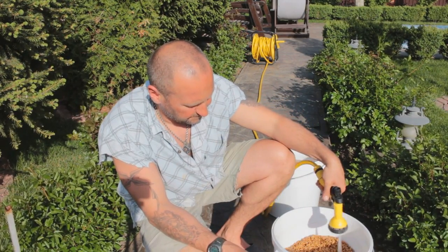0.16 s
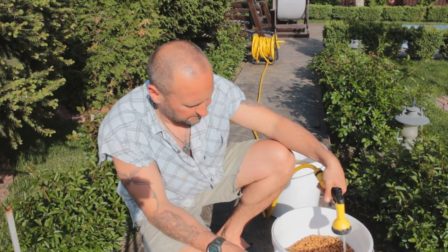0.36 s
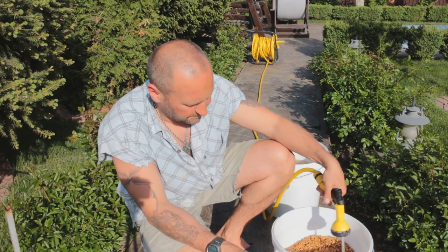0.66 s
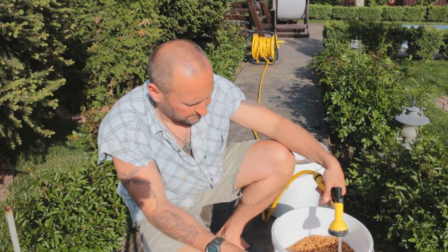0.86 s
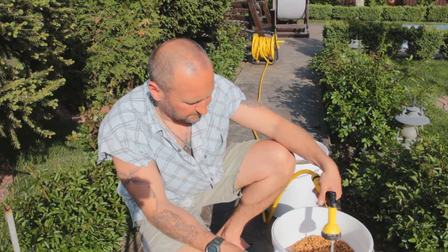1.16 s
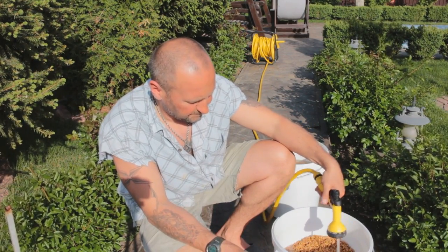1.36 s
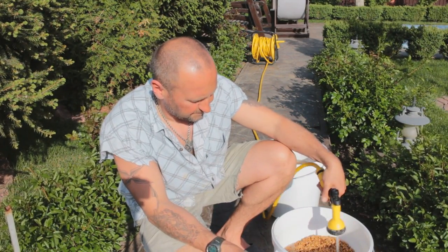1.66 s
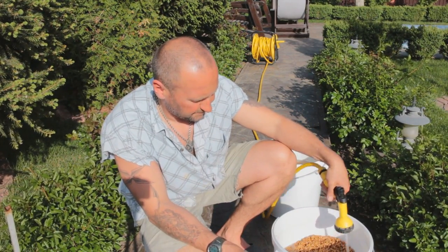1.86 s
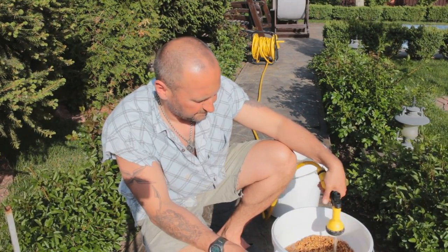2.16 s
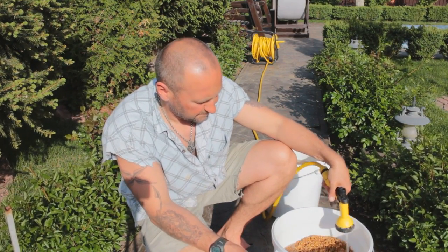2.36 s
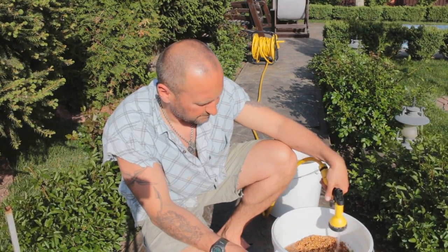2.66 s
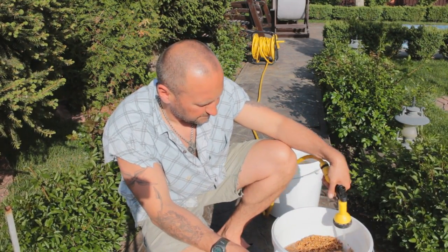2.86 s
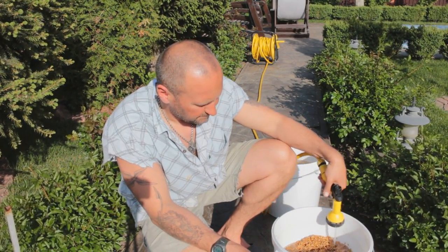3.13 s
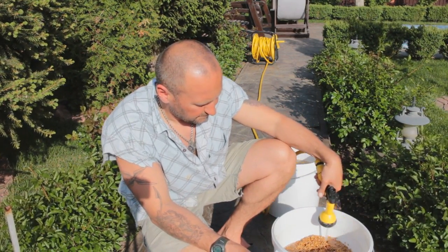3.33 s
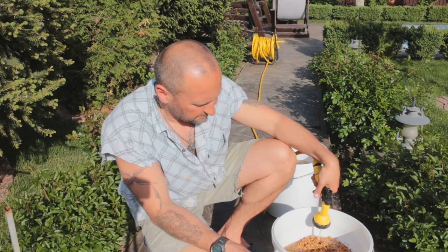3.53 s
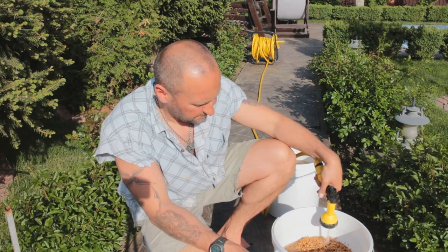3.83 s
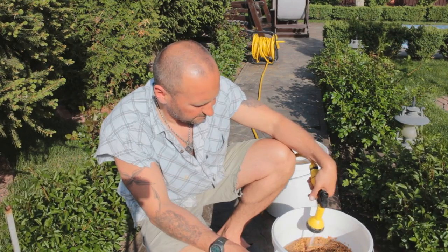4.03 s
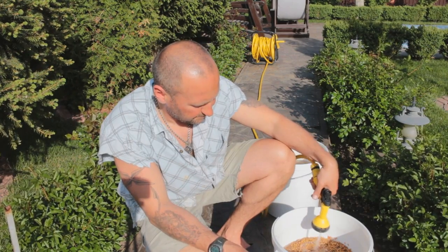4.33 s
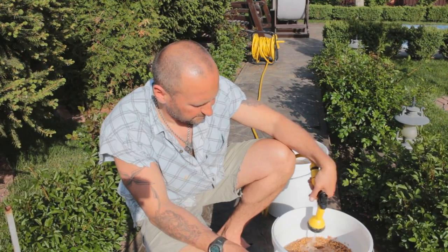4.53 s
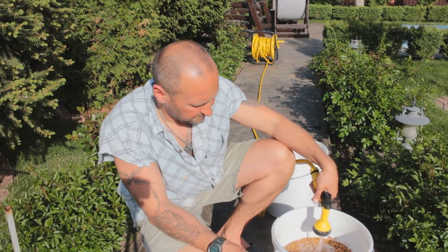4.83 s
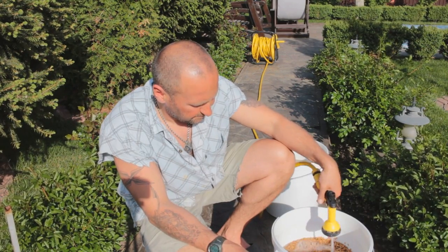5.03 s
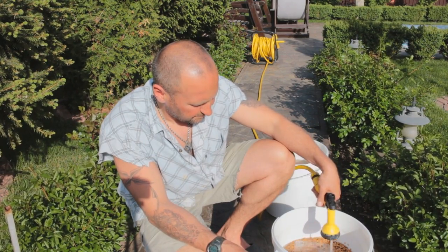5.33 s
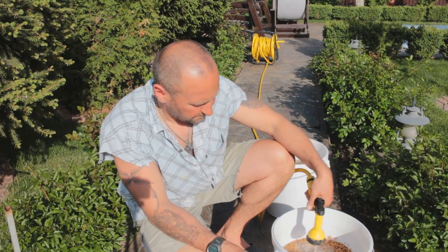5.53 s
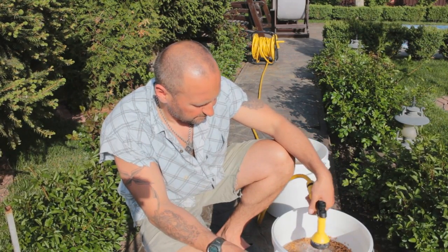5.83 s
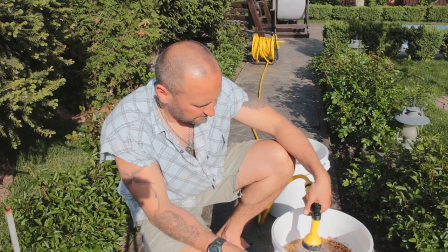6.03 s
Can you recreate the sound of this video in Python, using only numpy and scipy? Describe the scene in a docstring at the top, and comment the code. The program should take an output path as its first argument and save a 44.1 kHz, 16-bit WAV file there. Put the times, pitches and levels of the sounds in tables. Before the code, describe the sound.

A garden hose sprays water into a plastic bucket of grain, close by, for the whole six seconds: a mix of splashing, small bubbles and bright hiss. The bucket adds a slightly hollow ring that shifts about every half second as the jet moves. The water swells briefly at the start and at 0.7 seconds, then surges in quick, splashy pulses from about 2.3 to 5 seconds. Small plops fall near 2.4, 3.1, 3.5, 5.5 and 6.1 seconds. From about 5 seconds a soft low rumble joins as the water deepens. Wind buffets the microphone with low, wide rumbles and thumps, strongest near 0.2, 1.1, 2 to 2.2 and 2.9 seconds, mostly on the right, with one more thump on the left at 5.3 seconds. A faint, distant garden rustle lies underneath throughout.

```python
"""In a garden, a hose jet waved by hand splashes into a plastic bucket of grain that fills with water.
Splash, spray and bubbles make the air in the bucket ring, and the tone changes with the spot the jet
hits. A few big drops plop, and deeper water adds a rumble. Gusts buffet two microphone ports (openings);
the camera widens this bass by subtracting part of each from the other. Far off, the garden rustles."""
import sys
import numpy as np
from scipy import signal
from scipy.fft import rfft, irfft, next_fast_len
from scipy.io import wavfile
from scipy.ndimage import uniform_filter1d, map_coordinates

SR = 44100
rng = np.random.default_rng(int(sys.argv[2]) if len(sys.argv) > 2 else 0)


def unload_audio(sound):
    """Save the sound as a 16-bit wav file, at the path given as the first command line argument."""
    columns = np.transpose(np.atleast_2d(sound))
    # keep every value between -1 and 1, then stretch to whole-number steps
    steps = np.round(np.clip(columns, -1, 1) * 32767)
    wavfile.write(sys.argv[1], SR, steps.astype(np.int16))


N = 272979

# The jet between surges. Each row: time in seconds, then bubble, splash, spray and mist levels in dB.
JET_FLOW = [(0.0, -49.5, -41.5, -35, -37.5), (0.5, -48.5, -40.5, -36.5, -41), (1.15, -55, -42, -39.5, -43),
            (1.55, -46.5, -38, -41.5, -44.5), (2.2, -47, -38, -37.5, -39), (2.65, -42.5, -38.5, -39.5, -47),
            (3.1, -43, -35.5, -41.5, -38), (3.35, -42, -37, -49.5, -48.5), (3.7, -41.5, -42.5, -38, -42),
            (4.15, -44.5, -38.5, -40.5, -38.5), (4.7, -42.5, -37.5, -41.5, -37.5),
            (5.2, -41.5, -35.5, -35, -35), (5.6, -45.5, -38.5, -37.5, -39), (6.19, -41.5, -38, -40.5, -43)]
# Swings of the jet. Each row: middle and length in seconds, swell in dB, pitch in octaves above 1 kHz.
JET_SURGES = [(0.014, 0.03, 17, 0.2), (0.67, 0.087, 12.5, 0.26), (0.977, 0.2, 3.5, 2),
              (1.257, 0.17, 2.5, 2), (1.434, 0.17, 6.5, 3.5), (1.72, 0.27, 4.5, 3), (1.985, 0.13, 4, 3),
              (2.328, 0.11, 5.5, 4), (2.409, 0.1, 5.5, 0), (2.528, 0.23, 13, 3.5), (2.71, 0.096, 8.5, 3.5),
              (2.785, 0.16, 13, 4), (2.988, 0.14, 10, 2.5), (3.275, 0.22, 11.5, 3.5),
              (3.434, 0.094, 8.5, 3), (3.581, 0.21, 10, 2.5), (3.813, 0.097, 12.5, 1.91),
              (3.993, 0.14, 12.5, 1.83), (4.187, 0.1, 11, 2.5), (4.321, 0.11, 13, 2.07),
              (4.443, 0.09, 9, 2), (4.567, 0.1, 14, 2), (4.663, 0.092, 17.5, -2), (4.808, 0.11, 6.5, 1.5),
              (4.95, 0.076, 6.5, 1.3), (5.382, 0.043, 4, 1.5), (6.105, 0.093, 4, 1)]
# Where bubbles, splash, spray and mist sit for a surge, in octaves above 1 kHz.
LAYER_OCTAVES = [-.4, 1, 2.2, 3.1]
# The tone of each noise. Each row: pitch in Hz, relative level in dB.
BUBBLE_TONE = [(250, -62), (450, -4.5), (650, -2), (900, -3), (1200, 4.5), (2000, -13)]
SPLASH_TONE = [(500, -23), (1150, -11.5), (1300, 5.5), (2800, 1.5), (3600, 4.5), (6000, -67)]
SPRAY_TONE = [(1800, -16), (3000, -6.5), (3600, -2), (5600, 2.5), (6800, -2.5), (10000, -55)]
MIST_TONE = [(3500, -17.5), (5500, -5.5), (7000, -4.5), (9200, -1.5), (10500, -8), (11600, -13.5),
             (15500, -20.5)]
RUMBLE_TONE = [(90, -30), (150, -7.5), (230, -0.5), (300, -16), (450, -3.5), (700, -33.5)]
EDDY_TONE = [(8, -0.5), (25, -18), (60, -6), (100, -0.5), (150, -5.5), (300, -21), (700, -50),
             (1500, -57.5)]  # before wind speed shifts the pitch
GARDEN_TONE = [(20, -75), (110, -4.5), (240, -15), (350, -3), (480, -15), (4000, -25), (15500, -31)]
# The lowest mode (ringing note) of the bucket's air. The row: pitch in Hz, width in Hz, level in dB.
LOW_MODE = [(801, 60, 8)]
# Higher modes, one list for each spot the jet hits. Each row: pitch in Hz, width in Hz, level in dB.
SPOT_MODES = [
    [(1357, 170, 1.5), (2030, 1000, 7.5), (2700, 140, 9.5), (3680, 200, -6.5)],
    [(1362, 220, 5), (2076, 870, 7), (2620, 98, 8.5), (3180, 82, -4), (3760, 190, -10)],
    [(1360, 370, 2.5), (2129, 1200, 8), (2720, 390, 2.5), (3570, 740, -2), (4280, 160, -2)],
    [(2080, 473, -14), (2500, 300, -5.5), (4520, 370, 0.5), (5170, 330, -11)],
    [(1420, 260, 3.5), (2060, 390, 10), (2590, 270, 6.5), (3190, 263, -2), (3780, 150, -5)],
    [(1280, 190, -9), (2100, 270, -5), (2697, 342, 0.5), (3340, 230, -6), (4100, 510, -8)],
    [(1187, 200, -0.5), (1980, 670, -10), (2520, 310, -8), (3850, 250, -2.5), (4360, 990, -9)],
    [(1210, 193, 9), (1993, 700, 6), (2470, 350, 1), (3730, 440, -1.5), (4500, 600, -8)],
    [(1233, 93, 4), (1890, 263, -0.5), (2530, 410, 3), (3180, 830, -1), (4120, 900, -3.5)],
    [(1245, 91, 0), (2523, 280, 5.5), (3030, 120, 3.5), (3670, 120, 1), (4650, 470, 1)],
    [(1252, 206, 2.5), (2480, 520, 10), (3100, 380, 2), (3750, 430, 2.5), (4660, 200, 2.5)],
    [(1520, 200, 9.5), (1940, 200, 11), (2586, 710, 7.5)],
    [(1490, 260, 5.5), (2400, 115, 10.5), (2820, 180, 7), (3320, 320, 1.5), (4770, 210, -9)],
]
# When the jet moves on to the next spot, in seconds.
MOVE_TIMES = [.58, 1.4, 1.93, 2.36, 2.62, 3.1, 3.73, 4.13, 4.7, 5.02, 5.45, 5.85]
# Single big drops. Each row: start in seconds, strength in dB, pitch in Hz.
BIG_DROPS = [(2.394, -10, 1920), (3.136, -9, 1540), (3.521, -3, 2350), (5.5234, -8.5, 2100),
             (6.102, -11, 2304)]
# Light wind at both ports. Each row: time in seconds, level in dB.
BREEZE_LEVELS = [(0, -32.5), (.35, -48), (.85, -41), (1.5, -38), (2.3, -34.5), (2.6, -37), (3.2, -41),
                 (4.18, -46), (4.9, -34.5), (5.75, -41.5), (5.95, -53), (6.19, -61)]
# Gusts. Each row: middle in seconds, hold in seconds, level in dB, port (0 left, 1 right).
PORT_GUSTS = [(0.131, .12, -21.5, 0), (0.182, 0.051, -15, 1), (0.253, 0.0058, -27, 0),
              (0.721, 0.011, -27.5, 1), (1.052, 0.046, -10, 1), (1.11, 0.22, -21, 0),
              (1.298, 0.048, -20.5, 0), (1.301, 0.024, -13, 1), (1.516, 0.093, -27, 0),
              (1.738, .02, -13.5, 0), (1.741, 0.03, -22, 1), (1.899, 0.015, -20, 0),
              (1.906, 0.033, -23.5, 1), (1.974, 0.02, -18, 1), (2.139, 0.16, -17, 0), (2.153, 0.13, -13, 1),
              (2.355, 0.16, -27, 1), (2.443, 0.028, -23.5, 0), (2.708, 0.077, -22.5, 1),
              (2.845, 0.26, -20, 0), (2.852, 0.07, -13, 1), (3.002, 0.072, -25, 1),
              (3.097, 0.039, -29.5, 0), (3.123, 0.018, -29.5, 1), (3.539, 0.08, -27, 1),
              (3.543, .12, -27, 0), (4.764, 0.0053, -23.5, 0), (4.79, 0.038, -27, 1),
              (4.906, 0.0064, -25, 0), (5.253, 0.0045, -20, 0), (5.258, 0.02, -28.5, 1)]
# Strong eddies (swirls of air). Each row: time in seconds, peak in dB, port (0 left, 1 right).
EDDY_THUMPS = [(0.186, -3, 1), (1.058, -2, 1), (1.1, -13, 0), (1.176, -8.5, 0), (1.987, -10.5, 1),
               (2.15, -14, 1), (2.416, -26, 0), (2.883, -1.5, 1), (5.258, -6.5, 0)]
# How the ports differ. Each row: pitch in Hz, left over right in dB, right's lead in radians.
PORT_MISMATCH = [(1000, .5, 0), (2100, 0.3, 0.094), (5300, -1.5, 0.31), (6500, -.2, 0.069), (8600, .1, 0),
                 (12000, 3, 0.55), (13100, 0, 1), (14200, -1.8, .25)]
# A diffuse stereo wash of the water, with bright hiss. Each row: pitch in Hz, relative level in dB.
WASH_TONE = [(200, 0), (1200, -5), (2500, -3.5), (8300, -7), (11500, 9.5), (15500, 6)]

FRAME = dict(nperseg=1024, noverlap=768)  # cuts sound into short overlapping slices


def hose_jet():
    """Four sizes of water noise, from bubbles to mist, all shaken by the unsteady jet."""
    bubble_db, splash_db, spray_db, mist_db = jet_levels()
    flutter = 0.5 * wobble(30) + 0.56 * wobble(90)
    shake = lambda: flutter + .8 * wobble(20)  # each size also wavers on its own
    bubbles = patter(hz=748, spread=0.395, cycles=6.5, vary_db=3, share=0.1,
                     rise=0.055, number=2500, samples=700)
    splash = patter(hz=2138, spread=0.364, cycles=5.2, vary_db=-1.5, share=0.12,
                    rise=0.098, number=6000, samples=400)
    spray = patter(hz=4400, spread=0.274, cycles=12.7, vary_db=1.5, share=0.21,
                   rise=0.074, number=9000, samples=200)
    mist = patter(hz=12000, spread=0.36, cycles=2.3, vary_db=3.5, share=0.29,
                  rise=0, number=12000, samples=32)
    bubbles = unit(filtered(bubbles, lambda hz: 1 + ringing(hz, LOW_MODE)))
    bucket = bucket_ring()
    jet = (amp(bubble_db + shake()) * coloured(bubbles, BUBBLE_TONE)
           + amp(splash_db + shake()) * through(coloured(splash, SPLASH_TONE), bucket)
           + amp(spray_db + shake()) * through(coloured(spray, SPRAY_TONE), bucket)
           + amp(mist_db + shake() + 1.2 * flutter) * coloured(mist, MIST_TONE))
    return patchy(jet, streak_db=2.5, swish_db=1.8)


def jet_levels(reach_octaves=1.51, lag_s_per_octave=0.012):
    """Levels of the four water noises in dB. Each swing swells them, the coarser ones later."""
    t, layers = np.arange(N) / SR, np.array(LAYER_OCTAVES)[:, None]
    levels = np.array(curves(JET_FLOW))
    for middle, length, db, centre in JET_SURGES:
        gap = centre - layers
        swell = np.exp(-(2 * (t - middle - lag_s_per_octave * gap) / length) ** 2)
        levels += db * np.exp(-(gap / reach_octaves) ** 2) * swell
    return levels


def patter(hz, spread, cycles, vary_db, share, rise, number, samples):
    """Many tiny water blips at random times over hiss; share is their part of the power."""
    pitch_luck, size_luck = rng.standard_normal((number, 2)).T
    pitches = np.clip(hz * np.exp(spread * pitch_luck), 100, SR / 3)
    bursts = blips(rng.random(number) * N, pitches, cycles, amp(vary_db * size_luck), rise, samples)
    return np.sqrt(share) * unit(bursts) + np.sqrt(1 - share) * rng.standard_normal(N)


def blips(starts, hz, cycles, size, rise, samples):
    """Short tones that start softly, rise in pitch and die away, added at their start samples."""
    turns = hz[:, None] * np.arange(samples) / SR
    loudness = size[:, None] * np.exp(-3 * turns / cycles) * (1 - np.exp(-turns))
    waves = loudness * np.sin(2 * np.pi * turns * (1 + rise * turns / cycles))
    at = starts.astype(int)[:, None] + np.arange(samples)
    return np.bincount(at.ravel(), waves.ravel(), N + samples)[:N]


def bucket_ring(move_s=0.1, sink_per_s=.07, direct=.4, contrast=.35):
    """Gain over pitch and time: the bucket's air modes change with the spot hit, sink and waver."""
    hz, t = np.fft.rfftfreq(1024, 1 / SR)[:, None], np.arange(N // 256 + 2) * 256 / SR
    aim = sum(np.clip((t - s) / move_s + .5, 0, 1) for s in MOVE_TIMES)
    waver = .012 * np.interp(t * SR, np.arange(N), wobble(6))
    gain = np.zeros((len(hz), len(t)), complex)
    for spot, modes in enumerate(SPOT_MODES):
        on = np.abs(aim - spot) < 1
        tuning = 1 + waver[on] - sink_per_s * (t[on] - t[on].mean())
        ring = direct + ringing(hz / tuning, modes)
        gain[:, on] += (1 - np.abs(aim[on] - spot)) * ring * np.abs(ring) ** contrast
    return gain


def ringing(hz, modes):
    """How the bucket's air answers each pitch: most strongly near its modes."""
    return sum(amp(db) * 1j * hz * width / (pitch ** 2 - hz ** 2 + 1j * hz * width)
               for pitch, width, db in modes)


def big_drops():
    """Each big drop makes one short plop."""
    start_s, db, hz = np.transpose(BIG_DROPS)
    return blips(start_s * SR, hz, cycles=3.9, size=amp(db), rise=0.02, samples=600)


def deep_rumble(level_db=-47.5, half_on_s=5.13, rise_s=0.081):
    """Once the water stands deeper, a soft low rumble joins the jet."""
    fade_in = 1 / (1 + np.exp((half_on_s - np.arange(N) / SR) / rise_s))
    return amp(level_db + 1.8 * wobble(15)) * fade_in * coloured(rng.standard_normal(N), RUMBLE_TONE)


def at_ports(jet, wash_db=-12):
    """Both ports hear almost the same water, plus a diffuse, hissy wash that differs between them."""
    bands, _, slices = signal.stft(jet, SR, nperseg=1024)
    blurred = np.sqrt(uniform_filter1d(np.abs(slices) ** 2, size=3, axis=1))
    phases = np.exp(2j * np.pi * rng.random(slices.shape))
    slices = blurred * tone_gain(bands, WASH_TONE)[:, None] * phases
    wash = amp(wash_db) * signal.istft(slices, SR, nperseg=1024)[1][:N]
    pitch, db, lead = np.transpose(PORT_MISMATCH)
    half = lambda hz: np.sqrt(amp(np.interp(hz, pitch, db)) * np.exp(-1j * np.interp(hz, pitch, lead)))
    return filtered(jet, lambda hz: np.array([half(hz), 1 / half(hz)])) + wash * [[1], [-1]]


def wind_levels(edge_db_per_s=420):
    """Wind level at each port in dB: gusts rise, hold and fall on top of the breeze."""
    t, power = np.arange(N) / SR, amp(2 * np.array(curves(BREEZE_LEVELS) * 2))
    for middle, hold, db, port in PORT_GUSTS:
        outside_s = np.clip(np.abs(t - middle) - hold / 2, 0, None)
        power[int(port)] += amp(2 * (db - edge_db_per_s * outside_s))
    return 10 * np.log10(power)


def wind_buffet(db):
    """Eddies drift past a port. Stronger wind carries them faster, so louder is brighter."""
    speed = np.clip(amp(.3 * (db + 22)), .45, 3)
    place = np.cumsum(speed)
    eddies = coloured(rng.standard_normal(int(place[-1]) + 8), EDDY_TONE)
    push = map_coordinates(eddies, [place], order=1)
    push /= (np.abs(uniform_filter1d(push ** 2, size=2200)) + .05) ** 1.01  # tame slow swells
    puffs_db = np.clip(-.25 * (db + 37), 0, 7.5) * wobble(14)  # weak wind comes in puffs
    return amp(db + puffs_db + 4.24 * wobble(45)) * unit(push)


def wind_thumps(hz=105):
    """Each strong eddy pulls on a port once, with a weaker push before and after."""
    out = np.zeros((2, N))
    square = (np.pi * hz * np.arange(-900, 900) / SR) ** 2
    pull = (1 - 2 * square) * np.exp(-square)
    for s, db, port in EDDY_THUMPS:
        out[int(port), round(s * SR) - 900:][:len(pull)] -= amp(db) * pull
    return out


def garden():
    """Far rustle, a low drone and microphone hiss, partly shared by the ports."""
    shared, side = (coloured(rng.standard_normal(N), GARDEN_TONE) for _ in range(2))
    return amp(-45.5 + 3.8 * wobble(4.846)) * np.array([shared + 0.14 * side, shared - 0.39 * side])


def patchy(x, streak_db, swish_db):
    """Add random narrow streaks and broad passing swishes to x, milder in the treble."""
    slices = signal.stft(x, **FRAME)[2]

    def patches(bands, frames):
        noise = uniform_filter1d(rng.standard_normal(slices.shape), bands, axis=0)
        return unit(uniform_filter1d(noise, frames, axis=1))

    depth_db = streak_db * patches(3, 24) + swish_db * patches(16, 16)
    depth_db *= np.linspace(.9, .6, len(slices))[:, None]
    return signal.istft(slices * amp(depth_db), **FRAME)[1][:N]


def through(x, gain):
    """Shape x with a gain over pitch and time, keeping its power about the same."""
    slices = signal.stft(x, **FRAME)[2]
    gain = gain[:, :slices.shape[1]]
    power = np.mean(np.abs(slices) ** 2, axis=1, keepdims=True)
    balance = np.sqrt(power.sum() / np.sum(power * np.abs(gain) ** 2, axis=0))
    return signal.istft(slices * gain * balance, **FRAME)[1][:N]


def coloured(x, tone):
    """Give x the tone of a table, at an average power of 1."""
    return unit(filtered(x, lambda hz: tone_gain(hz, tone)))


def tone_gain(hz, tone):
    """Read the gain at each pitch from a tone table."""
    pitch, db = np.transpose(tone)
    return amp(np.interp(np.log(hz + 1), np.log(pitch), db))


def filtered(x, response):
    """Multiply each pitch in x by response(hz)."""
    size = next_fast_len(x.shape[-1] + 8192)
    return irfft(rfft(x, size) * response(np.fft.rfftfreq(size, 1 / SR)), size)[..., :x.shape[-1]]


def wobble(rate):
    """A smooth curve through rate random points a second."""
    return map_coordinates(rng.standard_normal(int(N * rate / SR) + 4), [np.arange(N) * rate / SR])


def curves(rows):
    """One value per sample for each column after the time."""
    times, *columns = np.transpose(rows)
    return [np.interp(np.arange(N) / SR, times, column) for column in columns]


def amp(db):
    """Turn dB into gain."""
    return 10 ** (np.asarray(db) / 20)


def unit(x):
    """Scale x to an average power of 1."""
    return x / np.sqrt(np.mean(x ** 2) + 1e-20)


def scene(widen=0.47):
    """Water, garden and wind; each side loses part of the other's wind, which widens the bass."""
    left, right = wind_thumps() + [wind_buffet(db) for db in wind_levels()]
    wind = np.array([left - widen * right, right - widen * left])
    return at_ports(hose_jet() + big_drops() + deep_rumble()) + garden() + wind


def record(dry, notch_hz=11190, top_hz=15760):
    """Cut a narrow notch in the treble, clip at full scale and remove the highest pitches."""
    notch = lambda f: (notch_hz ** 2 - f * f + 1j * f * 30) / (notch_hz ** 2 - f * f + 1j * f * 240)
    clipped = np.clip(filtered(dry, notch), -1, 1)
    return filtered(clipped, lambda hz: hz < top_hz)


dry = scene()
out = record(dry)
unload_audio(out)
```